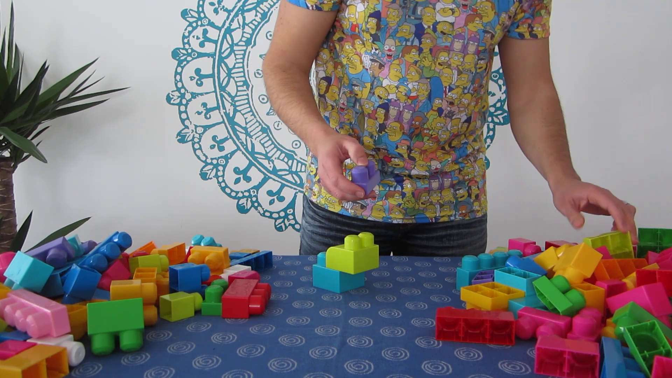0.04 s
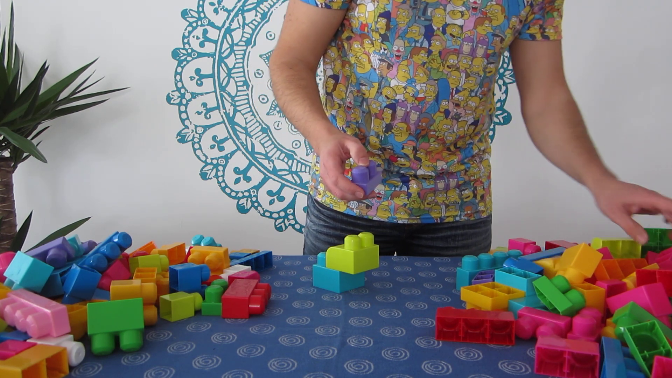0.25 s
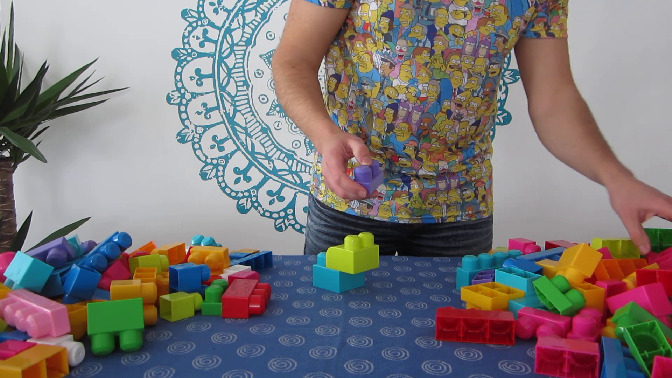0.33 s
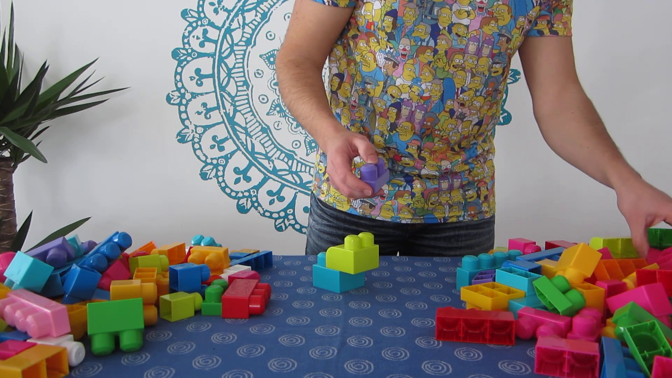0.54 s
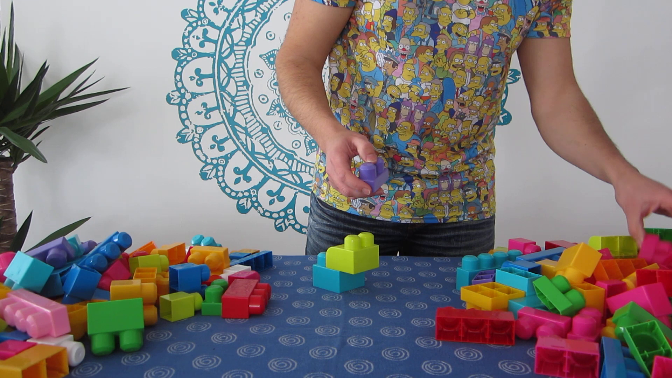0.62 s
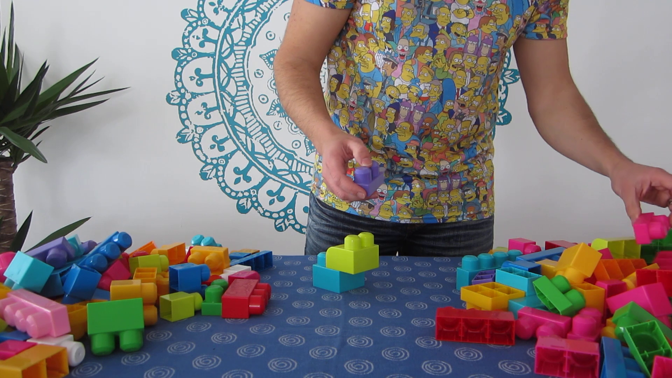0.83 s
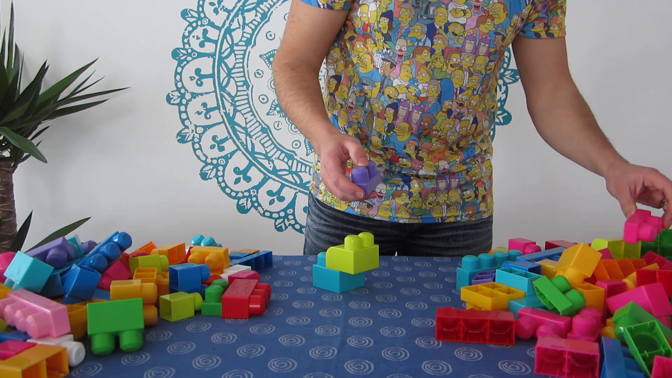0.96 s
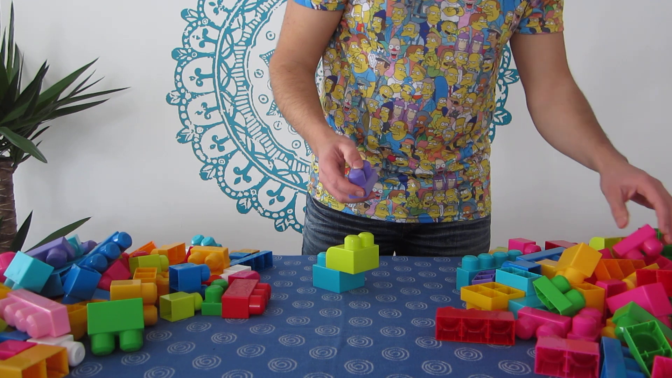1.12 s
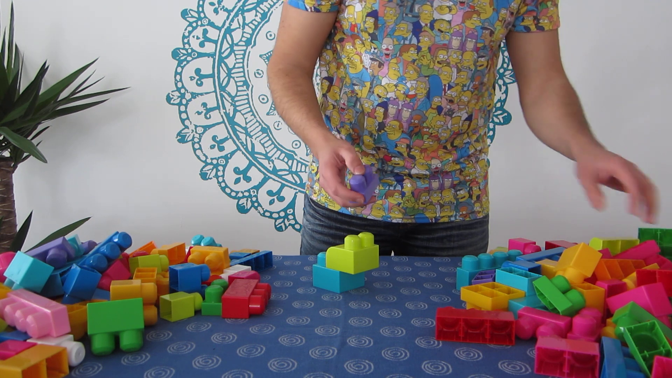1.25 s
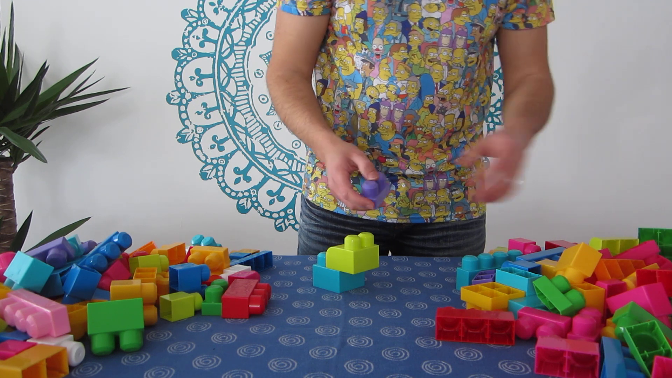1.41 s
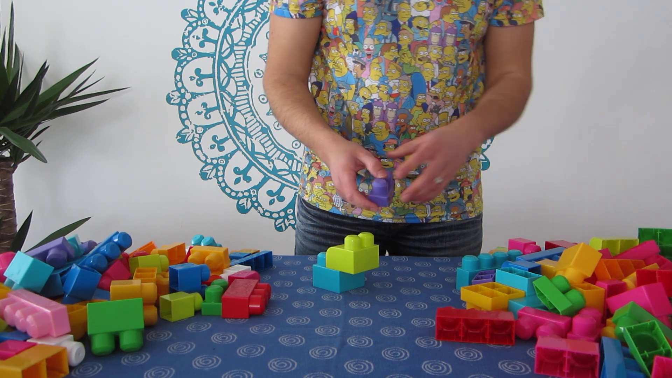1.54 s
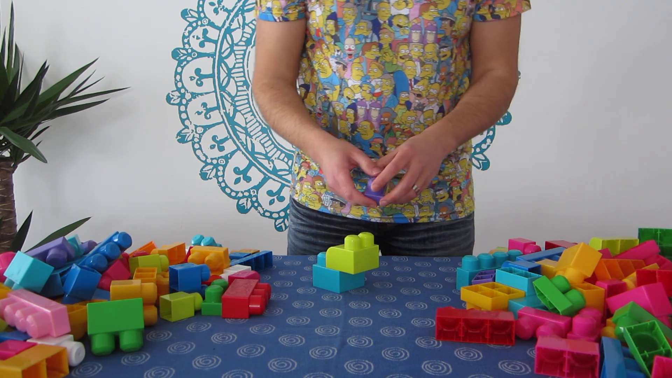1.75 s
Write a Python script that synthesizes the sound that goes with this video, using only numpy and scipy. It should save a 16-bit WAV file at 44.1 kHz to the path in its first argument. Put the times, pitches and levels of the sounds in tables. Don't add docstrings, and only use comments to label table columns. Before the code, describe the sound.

Hollow plastic toy blocks clack and rattle close to the microphone as a hand rummages through a heap on a table; one block drops back, tumbles briefly and settles, leaving a quiet, bare room.

```python
import sys
import numpy as np
from scipy import signal
from scipy.fft import rfft, irfft
from scipy.io import wavfile
from scipy.ndimage import uniform_filter1d

SR = 44100
rng = np.random.default_rng(int(sys.argv[2]) if len(sys.argv) > 2 else 0)


def digitize_waveform(pressure):
    field = np.atleast_2d(pressure).T
    bounded = np.clip(field, -1, 1)
    quanta = np.round(bounded * 32767).astype(np.int16)
    wavfile.write(sys.argv[1], SR, quanta)


def ratio(d):
    e = np.asarray(d, float) / 20
    return 10 ** e


N = 79380
LEAD = 4410

# frequency [Hz], level [dB]
WALLS = [(2000, -24.5), (3200, -2.5), (4800, -2.5), (6200, -4), (9000, -7.5), (12000, -13), (15500, -30)]


def evened(x):
    return x / np.sqrt(np.mean(x ** 2) + 1e-20)


def read(points, hz):
    f, value = np.transpose(points)
    return np.interp(np.log(hz + 1), np.log(f + 1), value)


def add(mix, start_s, sound):
    part = mix[max(LEAD + round(start_s * SR), 0):][:len(sound)]
    part += sound[:len(part)]


def floor():
    # frequency [Hz], level [dB per Hz]
    floor_colour = [(12, -18), (20, 6.5), (133, -3.5), (214, -2.5), (417, -9.5), (910, -10), (6580, -24),
                    (7770, -24), (15600, -34)]
    # time [s], level [dB]
    whine_rise = [(0, -3), (.2, -3), (.3, -9), (1.3, -9), (1.5, 0)]
    floor_db, whine_db = -53.5, -72
    whine_hz, whine_width_hz = 7865, 50
    hz = np.fft.rfftfreq(N, 1 / SR)
    noise = rfft(rng.standard_normal((2, N)))
    hiss = evened(irfft(noise[0] * ratio(read(floor_colour, hz)), N))
    resonance = 1 / (1 + (2 * (hz - whine_hz) / whine_width_hz) ** 2)
    whine = evened(irfft(noise[1] * resonance, N))
    whine_level_db = whine_db + np.interp(np.arange(N) / SR, *np.transpose(whine_rise))
    return ratio(floor_db) * hiss + ratio(whine_level_db) * whine


def room(x, count=3):
    # frequency [Hz], t60 [s]
    room_t60 = [(200, 0.54), (700, 0.62), (1800, 0.7), (3500, 0.42), (6500, 0.39), (12000, 0.28)]
    room_db, build_up_s = -2.5, 0.0038
    out, clock = np.zeros(len(x)), np.arange(len(x)) / SR
    for k in range(count):
        taps = np.zeros(SR)
        at = np.arange(0, SR - 20, 20) + rng.integers(0, 20, (SR - 1) // 20)
        taps[at] = rng.choice([-1., 1.], at.shape)
        hz, t, z = signal.stft(taps, SR, nperseg=256)
        dying = ratio(-60 * t / read(room_t60, hz)[:, None])
        tail = signal.istft(z * dying, SR, nperseg=256)[1]
        tail *= np.minimum(np.arange(len(tail)) / SR / build_up_s, 1) ** 2
        feed = np.sqrt(2 / count) * np.cos(np.pi * (3.1 * clock + k / count))
        out += ratio(room_db) * signal.fftconvolve(x * feed, tail / np.linalg.norm(tail))[:len(x)]
    return out


def near(x):
    # delay [s], level [dB]
    early = [(.0021, -7.5), (.0043, -6.5), (.0066, -12), (.0085, -9.5), (.0108, -19.5)]
    taps = np.zeros(1000)
    taps[0] = 1
    for k, (delay_s, level_db) in enumerate(early):
        taps[round(delay_s * SR)] += (-1) ** k * ratio(level_db)
    return signal.oaconvolve(x, taps)[:len(x)]


def thin(x):
    # frequency [Hz], level [dB]
    bass_cut = [(80, -18), (150, -8.5), (330, -5.5), (480, -0.5)]
    return irfft(rfft(x) * ratio(read(bass_cut, np.fft.rfftfreq(len(x), 1 / SR))), len(x))


def rustle():
    # time [s], level [dB]
    rubbing = [(0, -55), (.14, -64), (.22, -78), (.47, -72), (.53, -60), (.75, -60), (.82, -78), (1.8, -90)]
    noise, grains = rng.standard_normal((2, N))
    rub = evened(irfft(rfft(noise) * ratio(read(WALLS, np.fft.rfftfreq(N, 1 / SR))), N))
    grain_db = 3 * evened(uniform_filter1d(grains, size=120))
    return rub * ratio(grain_db + np.interp(np.arange(N) / SR, *np.transpose(rubbing)))


def ring(t, hz, db, t60, phase=0):
    hz, db, t60, phase = (np.reshape(v, (-1, 1)) for v in (hz, db, t60, phase))
    decay = ratio(db - 60 * t / np.maximum(t60, .003))
    return (decay * np.sin(2 * np.pi * (hz * t + phase))).sum(0)


def note(start_s, level_db, pitch_hz, ring_ms, draws):
    rise_s, free_t60, damped_t60 = .0007, 0.1, 0.0074
    twin_db, twin_spread = -12, .09
    t = np.arange(4000) / SR
    twin_hz = pitch_hz * (1 + twin_spread * (2 * draws[0] - 1))
    damping = ratio(-60 * np.maximum(t - ring_ms / 1000, 0) / damped_t60)
    t60 = max(free_t60, 4 * ring_ms / 1000)
    tones = ring(t, [pitch_hz, twin_hz], [level_db, level_db + twin_db], t60, [0, draws[1]])
    return start_s, np.minimum(t / rise_s, 1) * damping * tones


def burst(colour, envelope, draws, peak_hz=0, edge_db=0):
    lumpy_db, peak_height_db, peak_width = 1.3, 7, 0.086
    edge_from_hz, edge_full_hz = 5000, 11000
    hz = np.fft.rfftfreq(len(envelope), 1 / SR)
    lumps = np.interp(np.log(hz + 1), np.linspace(np.log(300), np.log(16000), 30), draws[1, :30])
    peak_db = peak_height_db * np.exp(-(np.log((hz + 1) / (peak_hz + 1)) / peak_width) ** 2)
    sharp_db = edge_db * np.clip((hz - edge_from_hz) / (edge_full_hz - edge_from_hz), 0, 1)
    colour_db = read(colour, hz) + lumpy_db * lumps + peak_db + sharp_db
    x = irfft(rfft(draws[0]) * ratio(colour_db)) * envelope
    return x / abs(x).max()


def contact(start_s, crack_db, peak_hz, body_db, edge_db, draws):
    # frequency [Hz], level [dB]
    body_colour = [(300, -31), (520, -8), (950, -2), (1400, -5.5), (1950, -1), (2800, -12.5), (4000, -20.5),
                   (6000, -56)]
    snap_t60, crack_t60, body_t60, thud_t60 = 0.0072, 0.019, 0.029, 0.021
    chatter_db, grainy_db, thud_db = -4.5, 2.5, -13.5
    slip_s, rise_s = .0006, 0.00037
    t = np.arange(draws.shape[-1]) / SR
    grains = ratio(grainy_db * evened(uniform_filter1d(draws[4], size=50)))
    snap = ratio(-60 * t / snap_t60) + grains * ratio(chatter_db - 60 * t / crack_t60)
    crack = burst(WALLS, snap, draws[:2], peak_hz, edge_db)
    clatter = burst(body_colour, ratio(-60 * t / body_t60), draws[2:4])
    body = clatter + ring(t, 132, thud_db, thud_t60)
    return start_s + slip_s, ratio(crack_db) * np.minimum(t / rise_s, 1) * (crack + ratio(body_db) * body)


def spread(sound):
    power = uniform_filter1d(abs(rfft(sound)) ** 2, size=15)
    return np.roll(irfft(np.sqrt(abs(power))), 200)[:400]


def scene():
    # start_s [s], crack_db [dB], loudest wall mode peak_hz [Hz], body_db [dB], edge_db [dB]
    earlier = (-0.03, -28, 3400, 8.5, 2)
    rummage = [(0.0562, -29.5, 3000, -12, 5), (0.0786, -31, 2980, -5, -2), (0.15, -37, 3500, -1, -2),
               (0.1954, -35, 3080, -10, -3), (0.2003, -18, 4850, -4.5, 0.5), (0.204, -24.5, 4860, -2.5, -2),
               (0.2252, -18.5, 3500, -2, 1), (0.2331, -11, 3550, -3.5, 1.5), (0.2617, -26, 3540, 0, -2),
               (0.2648, -19, 3280, -3, -1), (0.2973, -26, 3260, 0, 1), (0.334, -16, 3200, -6.5, -2.5),
               (0.3384, -23.5, 3740, 3.5, -1), (0.4837, -41, 3680, -6, -9), (0.4963, -25.5, 3500, -1, -1),
               (0.6008, -23, 3700, 0, -2), (0.6074, -24, 2900, -1.5, -1), (0.619, -26.5, 5340, 1, 0),
               (0.6355, -32, 3400, 3, 4), (0.6743, -18.5, 3360, -4.5, 0), (0.8122, -23, 3300, -4, 0),
               (0.8233, -26.5, 3250, 2, 1), (0.8543, -29.5, 3780, 2.5, 0), (0.8774, -15.5, 3170, -1.5, 4),
               (0.9012, -16.5, 4080, -3, -1), (0.9567, -25.5, 3750, 2, 0)]
    tumble = [(1.1074, -9.5, 4520, 0, -2.5), (1.1343, -19, 2900, 3.5, 2), (1.154, -18.5, 3660, 2, -1),
              (1.159, -21, 4530, 0, 2), (1.1775, -35, 3480, 15.5, -3), (1.2128, -20, 3720, -6, 3),
              (1.2334, -44, 3030, 10, 0), (1.2445, -30.5, 3550, 3, -3), (1.2504, -19.5, 3660, -9, 2),
              (1.2595, -17, 3570, -6.5, -1), (1.2743, -25, 3960, 4, 0), (1.2834, -28.5, 2950, 2, 2),
              (1.2915, -32, 3970, 5.5, -7)]
    further_hits = [
        (1.3, -48, 6500, 3, 0),
        (0.0087, -46, 3500, -9, -8),
        (.986, -39, 4000, 0, 2),
        (.281, -27, 4700, -5, -8),
        (1.2705, -29, 4300, -4, 0),
        (.928, -38, 3200, 4, 2),
        (.678, -25, 3200, 3, -1),
    ]

    # start_s [s], level_db [dB], pitch_hz [Hz], free ring_ms [ms]
    earlier_notes = [
        (-.03, -20, 1820, 6.9),
        (-.03, -22, 1410, 4.9),
    ]
    hollow = [(.149, -46, 686, 8), (.2255, -14.5, 679, 9), (.335, -25.5, 1126, 12.4), (.498, -33, 980, 14),
              (.623, -28.5, 1044, 8), (.675, -43, 970, 5.6), (.725, -45, 1020, 6.6), (.814, -38, 1154, 7.6),
              (.857, -23, 1135, 11), (.878, -19, 520, 7), (.8785, -22, 717, 7.3), (.916, -31, 784, 4.6),
              (.957, -25, 644, 4), (.958, -28, 1000, 8.6), (1.108, -13, 1007, 11.3),
              (1.154, -23.5, 630, 1.8), (1.16, -22.5, 1086, 22), (1.2618, -22.5, 680, 1.2),
              (1.264, -28, 1076, 8.5), (1.274, -28.5, 1080, 11)]
    studs = [(.0564, -39.5, 2820, 4), (0.078, -39.5, 2940, 4.6), (.1954, -41, 2320, 2.4),
             (0.2348, -12, 1832, 3.5), (.240, -15.5, 1875, 7.7), (.252, -17, 1720, 6.1),
             (0.2616, -18, 1800, 1.9), (.266, -26, 1910, 5.3), (.277, -25.5, 1872, 17),
             (.3127, -28, 1904, 12), (.3376, -35, 1930, 3.3), (.497, -20.5, 1740, 3.1),
             (.504, -30, 1770, 34), (.676, -28.5, 2190, 6.2), (.7467, -32, 1742, 17),
             (.8125, -29.5, 2175, 8.6), (.855, -34, 2140, 10), (.8794, -29, 2040, 2.9),
             (0.9019, -21.5, 2600, 2.4), (.959, -28, 1920, 2.5), (1.1082, -17.5, 2334, 12),
             (1.135, -24.5, 2804, 10), (1.1604, -40, 1920, 6.4), (1.175, -25, 1620, 5),
             (1.2145, -21.5, 1870, 3.5), (1.2224, -26.5, 1935, 6.1), (1.282, -28.5, 2490, 4.6),
             (1.2898, -24, 1690, 8.6)]
    dropped = [
        (1.108, -22, 665, 10),
        (1.108, -17, 2818, 5.2),
        (1.108, -29, 2700, 9.3),
        (1.108, -24.5, 4500, 5.3),
    ]
    further_notes = [
        (.975, -35, 830, 88),
        (0.0098, -45, 900, 12),
                     (.2008, -27.5, 4900, 6.7), (.2345, -29, 6500, 8.2), (.2345, -26.5, 3650, 11.6),
            (.6015, -29, 2130, 2.2), (.878, -28.5, 8900, 2.2), (.813, -37, 8760, 3.3),
            (.813, -33, 3300, 6.4), (.9018, -29.5, 4360, 1.6), (1.251, -34, 9400, 1.8),
            (1.261, -37, 9400, 2), (1.261, -34, 5600, 4), (1.1085, -32.5, 6200, 7), (.3345, -32, 6000, 5),
            (.675, -30.5, 2670, 2.4), (1.3, -25, 1570, 1.5), (1.3, -25, 1050, 5.1), (.83, -35, 1170, 11),
            (-.02, -24.5, 1990, 7), (-.02, -26.5, 840, 7), (-.02, -30, 590, 7), (.228, -37, 150, 24),
            (0.44, -42, 154, 60), (.878, -37.5, 213, 15), (.71, -45, 667, 10), (.498, -35, 720, 12),
            (.009, -44, 3500, 8), (1.555, -56, 2300, 10), (.288, -29, 1860, 7), (1.214, -31, 3700, 3),
            (.8135, -37, 760, 10), (1.1595, -33, 10200, 2), (1.135, -33, 9800, 2), (.525, -44, 800, 45),
            (1.2995, -37, 1240, 20)]

    still = floor()
    cracks, sent, hollows = np.zeros((3, N + LEAD))
    hits = [earlier] + rummage + tumble + further_hits
    notes = earlier_notes + hollow + studs + dropped + further_notes
    for row, draws in zip(hits, rng.standard_normal((60, 5, 2048))):
        start_s, sound = contact(*row, draws)
        add(cracks, start_s, sound)
        add(sent, start_s, spread(sound))
    for row, draws in zip(notes, rng.random((120, 2))):
        add(hollows, *note(*row, draws))
    send = ratio(-7.5)
    echoing = near(cracks + send * hollows) + room(sent + send * hollows)
    blocks = ratio(-2) * echoing + (1 - send) * hollows
    return (thin(blocks)[LEAD:] + still + rustle())[None]


def band_limit(x):
    return signal.sosfilt(signal.butter(12, 16810, fs=SR, output="sos"), x)


def record(dry):
    edge_hz, above_edge_db, top_hz = 15780, -24, 16650
    hz = np.fft.rfftfreq(2 * N, 1 / SR)
    gain = ratio(above_edge_db * np.clip((hz - edge_hz) / 150, 0, 1)) * (hz < top_hz)
    mirrored = np.hstack([dry, dry[:, ::-1]])
    dulled = irfft(rfft(mirrored) * gain)[:, :N]
    return band_limit(dulled)


dry = scene()
out = record(dry)
digitize_waveform(out)
```